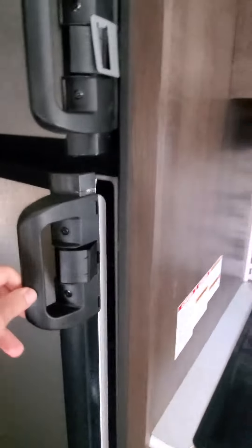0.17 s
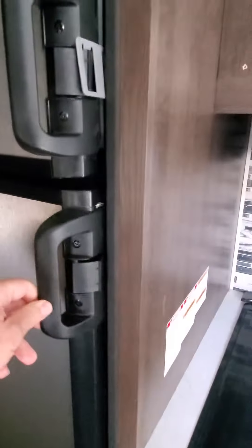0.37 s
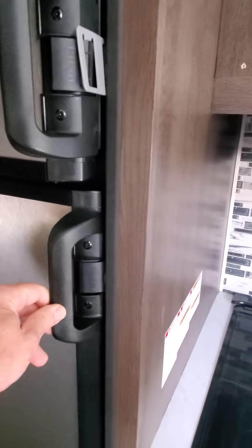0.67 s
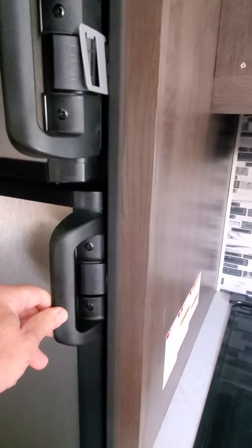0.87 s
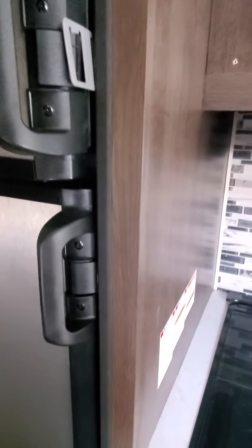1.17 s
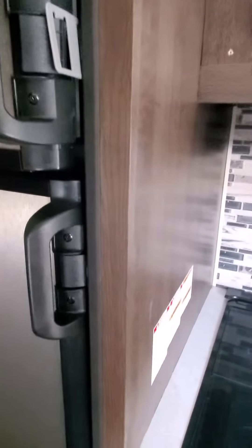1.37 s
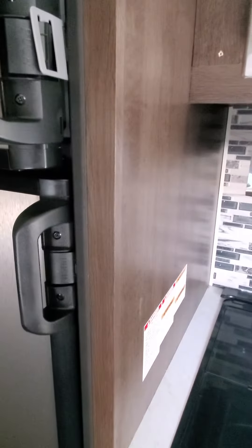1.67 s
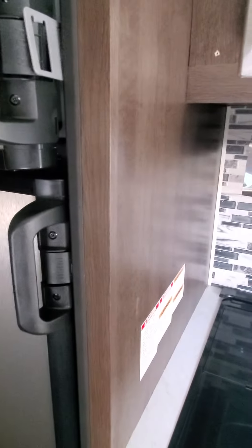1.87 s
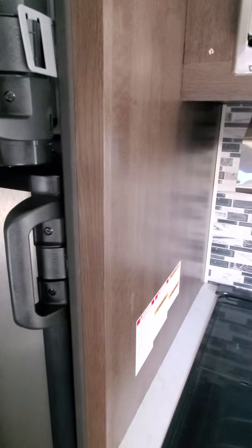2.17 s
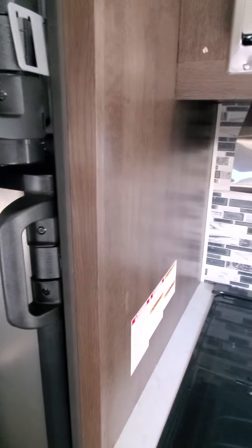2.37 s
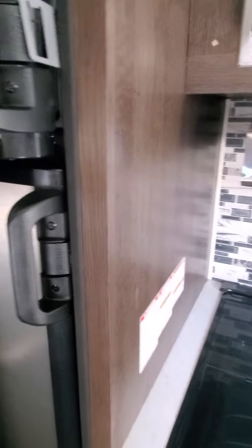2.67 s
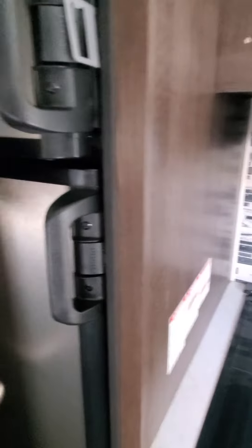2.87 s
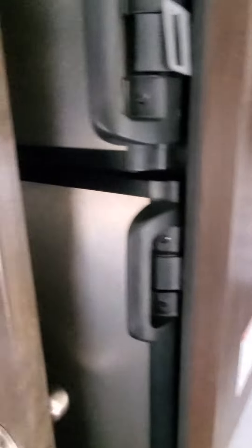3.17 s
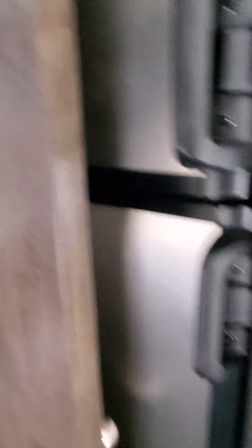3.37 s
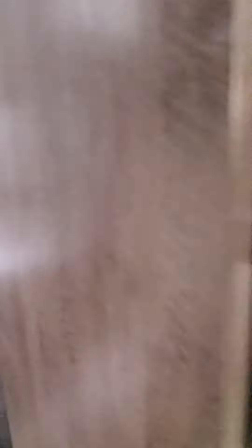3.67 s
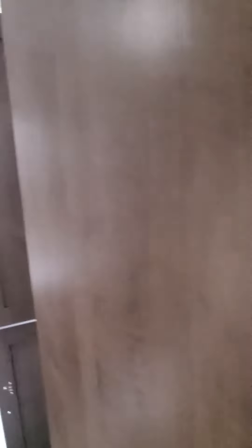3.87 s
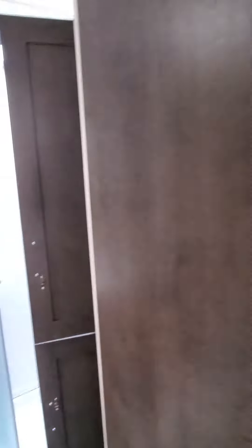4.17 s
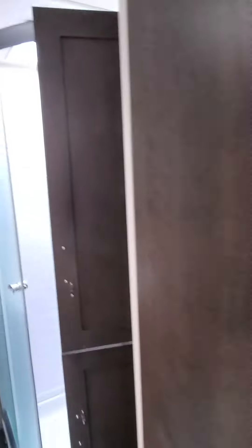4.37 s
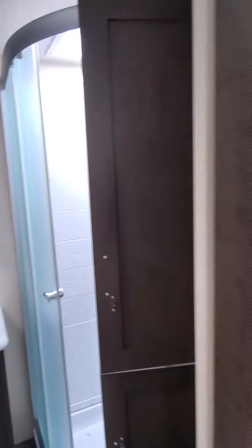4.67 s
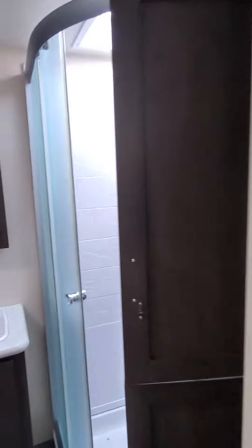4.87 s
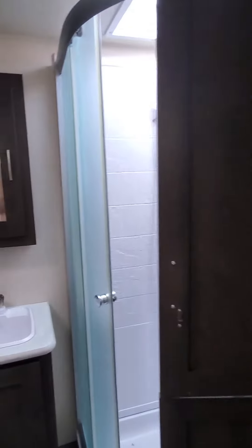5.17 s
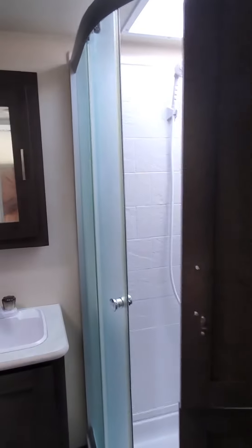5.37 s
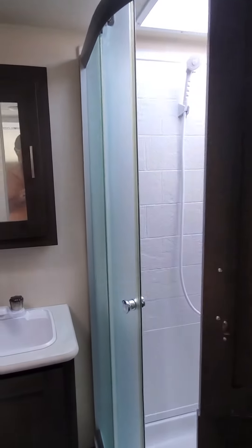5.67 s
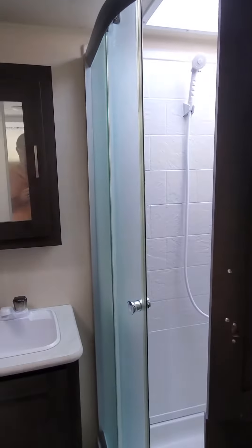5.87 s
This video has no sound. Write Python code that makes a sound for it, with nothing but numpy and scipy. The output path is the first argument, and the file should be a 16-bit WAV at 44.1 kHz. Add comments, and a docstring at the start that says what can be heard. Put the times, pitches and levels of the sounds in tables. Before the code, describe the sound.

A fridge door is pushed shut inside a small trailer: its plastic latch ticks, gives a sharp click, then snaps home with a loud clack and a short knock from the door panel. Someone then turns and walks, soles scuffing and sliding, heels thudding on the hollow floor, with a few small ticks among the steps. A hand-held phone picks it up close, over a low rumble and faint hiss.

```python
"""A low rumble, a murmur and a faint hiss fill a small trailer. In the first second a fridge
door is pushed shut: its plastic latch ticks, snaps and sets the door panel ringing. Then someone turns
and walks: soles scuff and slide, heels thud on the hollow floor, and a few small ticks fall among the
steps. A hand-held phone hears it all through two ports."""
import sys
import numpy as np
from scipy import signal
from scipy.fft import rfft, irfft, next_fast_len
from scipy.io import wavfile
from scipy.ndimage import uniform_filter1d, map_coordinates

SR = 44100
rng = np.random.default_rng(int(sys.argv[2]) if len(sys.argv) > 2 else 0)


def bounce(signal):
    """Save signal as a 16-bit WAV file at the path given by the first command-line argument."""
    frames = np.transpose(np.atleast_2d(signal))
    limited = np.clip(frames, -1, 1)
    pcm = np.round(limited * 32767).astype(np.int16)
    wavfile.write(sys.argv[1], SR, pcm)


N = 265878
T = np.arange(N) / SR

# Modes of the hollow floor. Each row: pitch in Hz, relative level in dB, seconds to fade by 60 dB.
FLOOR_MODES = [(53, -0.5, 0.67), (73, 0.5, 0.49), (108.3, 1.5, 0.4), (150.3, 4, .25), (206.8, 1.5, 0.22),
               (234, -9.5, 0.28), (292.2, 1, 0.17), (342.2, -8.5, 0.13), (400, -11.5, 0.034)]


def amp(db):
    """Decibels as a gain."""
    return 10 ** (np.asarray(db) / 20)


def unit(x):
    """x scaled to an rms of 1."""
    return x / np.sqrt(np.mean(x ** 2) + 1e-20)


def along(points, hz):
    """Read a curve of (Hz, value) points on a log frequency axis."""
    freqs, values = np.transpose(points)
    return np.interp(np.log(hz + 1), np.log(freqs + 1), values)


def wobble(rate):
    """A smooth random curve with `rate` knots a second."""
    return map_coordinates(rng.standard_normal(int(N * rate / SR) + 4), [T * rate])


def filtered(x, response):
    """x through a filter whose complex gain is a function of Hz."""
    n = x.shape[-1]
    padded = next_fast_len(n + SR // 8)
    return irfft(rfft(x, padded) * response(np.fft.rfftfreq(padded, 1 / SR)), padded)[..., :n]


def sides(pan_db):
    """Stereo gains that put the left pan_db above the right."""
    return amp(np.array([[.5], [-.5]]) * pan_db)


def add(out, start, x):
    """Mix x in from `start` seconds."""
    part = out[:, round(start * SR):][:, :x.shape[-1]]
    part += x[..., :part.shape[1]]


def rush(spectrum, n):
    """Stereo noise of rms 1 coloured by (Hz, dB) points: centred in the bass, wide in the treble."""
    # Each row: frequency in Hz, likeness of left and right from 0 to 1.
    likeness = [(60, 1), (250, 0.91), (600, 0.9), (1200, 0.13), (5000, 0.1), (12000, 0.17)]

    def mid_side_gains(hz):
        width = np.arccos(along(likeness, hz)) / 2
        return amp(along(spectrum, hz)) * [np.cos(width), np.sin(width)]

    mid, side = filtered(rng.standard_normal((2, n)), mid_side_gains)
    return unit(np.array([mid + side, mid - side]))


def cabin(x, wet_db):
    """The sound plus the cabin's diffuse tail, each frequency dying at its own speed."""
    # Each row: frequency in Hz, seconds to fade by 60 dB.
    reverb_times = [(100, 0.57), (1000, 0.28), (5000, 0.3), (12000, 0.2)]
    hz, t, bands = signal.stft(rng.standard_normal((2, SR // 3)), SR, nperseg=256)
    decay = amp(-60 * t / along(reverb_times, hz)[:, None])
    tail = signal.istft(bands * decay, SR, nperseg=256)[1]
    tail *= np.minimum(T[:tail.shape[1]] / 0.0026, 1)  # the walls answer one after another
    tail *= amp(wet_db) / np.linalg.norm(tail[0])
    response = np.pad(tail, ((0, 0), (SR // 400, 0)))  # 2.5 ms pre-delay
    response[:, 0] = 1  # direct sound
    return signal.fftconvolve(x, response, axes=1)


def background():
    """A lumpy rumble, a mid murmur and a thin, high hiss that dips and returns with the murmur."""
    # Each row: time in seconds, then the levels of rumble, murmur and hiss in dB.
    faders = [(0.0, -49.5, -59.5, -70), (0.2, -48.5, -56.5, -65.5), (0.6, -39.5, -54, -56.5),
              (0.82, -49.5, -68, -67.5), (1.07, -54.5, -65.5, -71.5), (1.299, -57, -69.5, -82),
              (1.6, -47.5, -64, -68), (1.9, -49, -63, -64), (2.28, -52.5, -57, -66),
              (2.4, -39.5, -56, -66.5), (2.6, -48.5, -60, -77), (2.97, -53.5, -59.5, -69.5),
              (3.46, -47.5, -59.5, -62.5), (4.0, -50, -58.5, -64), (4.35, -46, -59, -64),
              (5.299, -52, -61.5, -64.5), (5.44, -53, -65, -70.5), (5.751, -51.5, -65, -71.5),
              (5.8, -49, -63.5, -63.5), (6.03, -49.5, -62, -65.5)]
    # The colour of each layer. Each row: frequency in Hz, relative level in dB.
    rumble = [(12, -43), (20, -14), (49, -1), (107, -2), (145, -11.5), (174, -9), (206, -17), (241, -10),
              (264, -21), (450, -29), (580, -47), (990, -120)]
    murmur = [(250, -27.5), (400, -6), (600, -4.5), (900, 2), (1500, -1.5), (2200, -7.5), (3500, -49)]
    hiss = [(1000, -32), (2000, 4.5), (4000, 1), (7000, -3), (12000, -5), (16000, -4.5)]
    times, *levels = np.transpose(faders)
    sways_db = [.9 * wobble(rate) for rate in (7, 9, 14)]
    return sum(amp(np.interp(T, times, db) + sway_db) * rush(colour, N)
               for db, sway_db, colour in zip(levels, sways_db, (rumble, murmur, hiss)))


def from_below(x):
    """Sound from the floor reaches the left port a little later."""
    lag_s = np.array([[0.0004276], [0]])
    return filtered(x, lambda hz: np.exp(-2j * np.pi * hz * lag_s))


def slides():
    """A dragged sole swells into a hiss and keeps the floor boards droning, most at mid-stroke."""
    # Each row: start, end and rise in seconds, hiss and drone levels in dB, brightness from 0 to 1.
    drags = [(1.635, 2.329, 0.12, -44.5, -46, 0.02), (2.634, 2.758, 0.069, -40.5, -71, 0.88),
             (2.744, 2.865, 0.019, -34.5, -61.5, 0.79)]
    touch_db, arch_depth_db = -11.5, 7  # the hiss starts low; the drone sinks at both ends
    tilt_db_per_octave = 10  # a drag excites the higher boards more
    boards = sorted((hz * detune, level - drop_db + tilt_db_per_octave * np.log2(hz / 290))
                    for hz, level, _ in FLOOR_MODES[3:7]
                    for detune, drop_db in ((.96, 16), (1, 0), (1.04, 16)))
    out = np.zeros((2, N))
    for start, end, rise, hiss_db, drone_db, bright in drags:
        t = np.arange(0, end - start, 1 / SR)
        dull = rush([(200, -6), (600, -3), (2000, -1), (4500, -1.5), (9000, -16), (16000, -10)], len(t))
        fine = rush([(800, -10), (3000, -25), (6000, -5), (10000, 4), (16000, -10.5)], len(t))
        flutter_db = 1.2 * wobble(30)[:len(t)]
        swell_db = touch_db * np.maximum(1 - t / rise, 0)
        hiss = np.sqrt(1 - bright) * dull + np.sqrt(bright) * fine
        hiss *= amp(hiss_db + swell_db + flutter_db - 2.5)
        arch_db = -arch_depth_db * (2 * t / t[-1] - 1) ** 2
        drone = rush([(100, -69)] + boards + [(700, -23), (1500, -33)], len(t))
        drone *= amp(drone_db + arch_db - 1)
        fades = np.minimum(np.minimum(t, t[-1] - t) / 0.0066, 1)
        add(out, start, cabin(fades * (hiss + drone), wet_db=-7.5))
    return out


def grit(n):
    """Uneven contact: friction comes in fine lumps of about 2 ms."""
    lumps = unit(uniform_filter1d(rng.standard_normal(n), SR // 500))
    return unit(amp(0.81 * lumps))


def scuffs():
    """A sole brushes the floor, or a hand the handle: friction noise rises, holds and stops short."""
    # Each row: start in seconds, level in dB, rise and hold in seconds, tilt in dB per octave,
    # centre of a hollow resonance in Hz.
    strokes = [(0.614, -38.5, .012, 0.092, -2, 5970), (1.013, -59, 0.0077, 0.021, -1.5, 3860),
               (1.114, -43, 0.0083, 0.045, -2, 2080), (1.431, -60, .005, 0.059, 1.5, 4000),
               (1.573, -47, 0.0037, 0.011, -6.5, 4000), (2.256, -44, 0.0037, 0.084, -2.5, 2990),
               (2.381, -54, 0.0078, 0.034, 0.5, 5000), (3.051, -63, .02, 0.1, 6.5, 4960),
               (3.147, -44.5, 0.024, 0.042, -0.5, 6000), (3.299, -43.5, 0.0016, 0.097, -0.5, 5000),
               (3.32, -35, 0.01, 0.036, 3.5, 6140), (3.949, -54, 0.011, 0.01, -3.5, 1600),
               (4.047, -55, 0.0083, 0.027, -7.5, 1500), (4.121, -50.5, 0.038, 0.021, -4, 3100),
               (4.343, -26, 0.014, 0.034, 3, 6200), (4.482, -39.5, .004, 0.017, -1.5, 3060),
               (4.876, -48, 0.0015, 0.029, -2, 3740), (5.088, -59, .02, .08, -2.5, 4040),
               (5.201, -37.5, 0.004, 0.03, -1, 3030), (5.259, -53, 0.015, 0.052, 0.5, 6060)]
    # The colour of the friction. Each row: frequency in Hz, relative level in dB.
    sole_colour = [(150, -9), (500, -4.5), (1200, -2.5), (2500, -2), (5000, -5), (9000, 0.5), (16000, -8)]
    hz = np.geomspace(150, 16000, num=80)
    out, t = np.zeros((2, N)), T[:SR // 4]
    for start, db, rise, hold, tilt, hollow_hz in strokes:
        hollow_db = 2.5 + 3 * np.log2(6000 / hollow_hz)  # lower scuffs ring more hollow
        bell = np.exp(-(np.log2(hz / hollow_hz) / 0.22) ** 2)
        colour_db = along(sole_colour, hz) + tilt * np.log2(hz / 3000) + hollow_db * bell
        friction = grit(len(t)) * rush(np.transpose([hz, colour_db]), len(t))
        attack = np.minimum(t / rise, 1) ** 2
        release = np.exp(-np.maximum(t - rise - hold, 0) / 0.0012)
        scuff = amp(db - 1.5) * sides(pan_db=-0.8) * attack * release * friction
        add(out, start, cabin(scuff, wet_db=-2.5))
    return out


def heels():
    """A heel lands with a dull knock and rings the floor modes, the high ones more when it lands hard."""
    # Each row: time in seconds, level in dB, hardness in dB per octave, relative knock level in dB.
    thuds = [(0.115, -40.5, -8, -11), (0.298, -39, -8, -9.5), (1.446, -32.5, -3.5, -26),
             (1.555, -28, 3.5, -17), (2.331, -18, 1, -11), (2.408, -27, -8, -22), (2.57, -40, -7, -3),
             (2.629, -42.5, -11, 0), (2.854, -25, -6.5, -8), (3.091, -51.5, -22.5, -19),
             (3.297, -28, 1, -9.5), (4.331, -31.5, -2, -20.5), (4.453, -36.5, 1, -7),
             (4.735, -31, -6, -12.5), (4.88, -41, -4, -12.5), (5.223, -26, 2, -18)]
    knock_colour = [(120, -31), (250, 1.5), (500, -6.5), (800, -14.5), (1200, -17), (3000, -38)]
    hz, mode_db, t60 = np.transpose(FLOOR_MODES)[:, :, None]
    spread = 0.15 * np.array([1, -1])[:, None, None]  # each mode reaches the ports a little apart
    out, t = np.zeros((2, N)), T[:SR // 2]
    for start, db, hardness, knock_db in thuds:
        scatter_db, shift, skew = rng.standard_normal((3, len(FLOOR_MODES), 1))
        gain_db = mode_db + scatter_db + hardness * np.log2(hz / 110)
        phase = 0.51 * shift + spread * skew
        modes = amp(gain_db - 60 * t / t60) * np.sin(2 * np.pi * hz * t + phase)
        ring = modes.sum(1) * (1 - np.exp(-t / 0.0066))
        knock = rush(knock_colour, len(t)) * amp(-60 * t / 0.3) * (1 - np.exp(-t / 0.0076))
        add(out, start - .003, amp(db - 11) * ring + amp(db + knock_db - 1.5) * knock)
    return out


def door_panel():
    """The door's modes swell after a blow and fade."""
    # Each row: start in seconds, pitch in Hz, level in dB, rise in seconds, seconds to fade by 60 dB.
    modes = [(.462, 114.7, -23.5, 0.011, 0.26), (.655, 100, -28.5, 0.012, 0.055),
             (.666, 689, -22, .003, 0.073), (.666, 933, -25.5, 0.0014, .05),
             (.695, 239.5, -16, 0.018, 0.24)]
    out, t = np.zeros((2, N)), T[:SR // 2]
    for start, hz, db, rise, t60 in modes:
        swell = (1 - np.exp(-t / rise)) ** 2
        add(out, start, amp(db - 60 * t / t60) * swell * np.sin(2 * np.pi * hz * t))
    return out


def latch_and_ticks():
    """Each contact is a brief ring of the plastic part and a broad, wide clack that fills the cabin."""
    # The latch's clicks, then small ticks during the walk. Each row: start in seconds, level in dB,
    # left over right in dB, ring pitch in Hz, clack level against the ring in dB, decay time in ms.
    clicks = [(0.172, -36.5, 14, 1490, -16, 2), (0.178, -35, 8, 1450, -10, 1.8),
              (.179, -36.5, 4, 755, -3.5, 3.6), (0.1813, -43.5, -5, 3160, 2.5, 2.3),
              (0.3952, -40.5, -2.5, 6230, 2.5, 1.7), (0.419, -42, -2.5, 5740, 0, 1.4),
              (.4428, -21, -6.5, 3500, 2, 0.88), (0.445, -0.5, 15.5, 9600, -9, 0.27),
              (0.4446, -16.5, -1, 6750, 1, 0.75), (0.4521, -21.5, -8, 6300, -5.5, 0.7),
              (0.46, -34.5, -7, 3220, -2.5, 1.1), (0.532, -37.5, 1, 6170, 4, 0.95),
              (.595, -45.5, -3, 3900, 11, 1.7), (.627, -39.5, -5, 6400, 11.5, 1.9),
              (.665, -27.5, -6, 3600, 5, 1.2), (0.6679, -24, 7, 1300, -2, 1.9),
              (0.6738, -20.5, -10, 5600, 0.5, 0.96), (0.6836, -9.5, -3, 1980, 1, 0.98),
              (0.6841, -8, 3, 4680, 1.5, 0.71), (0.6875, -15.5, -1.5, 3300, 1.5, 1.3),
              (2.6222, -52, 0.5, 6500, 9.5, 2.9), (3.8518, -46, 8, 1800, -2, 1.3),
              (4.0343, -50, 6, 1300, -2.5, 1.2), (4.0502, -41.5, 6, 1550, -7.5, 1.4),
              (4.067, -49.5, 8, 3800, 3, 1.2), (4.27, -40.5, -8, 2200, -10, 0.74),
              (4.3005, -51, 2.5, 2000, -7, 0.95), (4.4859, -40, -2, 3030, 12, 1.6),
              (5.213, -35.5, -12, 6000, -8, 1.4), (5.2565, -36, -2, 6300, 0.5, 1.2),
              (5.317, -46, -2.5, 4500, -17, 1.1)]
    out, t = np.zeros((2, N)), T[:SR // 40]
    for start, db, pan_db, ring_hz, clack_db, decay_ms in clicks:
        def clack_band(hz):
            low_cut = (1j * hz / (550 + 1j * hz)) ** 2
            return low_cut / (1 + 1j * hz / (3 * ring_hz))

        clack = unit(filtered(rng.standard_normal((2, len(t))), clack_band))
        attack = np.minimum(t / 0.0003, 1)
        envelope = amp(db) * sides(pan_db) * attack * np.exp(-1000 * t / decay_ms)
        wet_db = -2.5 + 0.19 * (db + 25)  # harder clicks shake the cabinet more
        add(out, start, envelope * np.sin(2 * np.pi * ring_hz * t))
        add(out, start, cabin(envelope * amp(clack_db) * clack, wet_db))
    return out


def scene():
    """The fridge door and the footwork over the background."""
    return latch_and_ticks() + door_panel() + from_below(scuffs() + slides()) + heels() + background()


def record(dry):
    """The phone: its ports dip near 8 kHz and peak near 12 kHz, ahead of a clipper and a top cut."""
    # The tone of the ports. Each row: frequency in Hz, gain in dB.
    port_eq = [(20, -9), (60, 2.5), (1500, 2), (6400, 3.5), (7200, -0.5), (8200, -13), (9600, -7),
               (11800, 1), (14500, -6), (15500, -7), (16400, -23.5)]
    # The hand shades one port. Each row: frequency in Hz, left over right in dB.
    hand_shade = [(60, 0.2), (700, 2.5), (1300, 1), (2400, 0.5), (4400, -4.5), (15000, -5)]
    ceiling, top_hz = .96, 16600
    heard = filtered(dry, lambda hz: amp(along(port_eq, hz)) * sides(along(hand_shade, hz)))
    return filtered(np.clip(heard, -ceiling, ceiling), lambda hz: hz < top_hz)


dry = scene()
out = record(dry)
bounce(out)
```